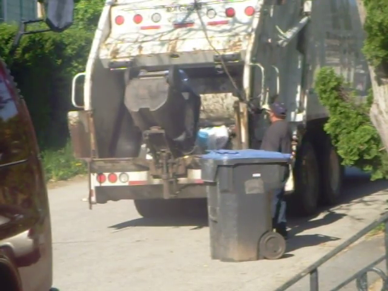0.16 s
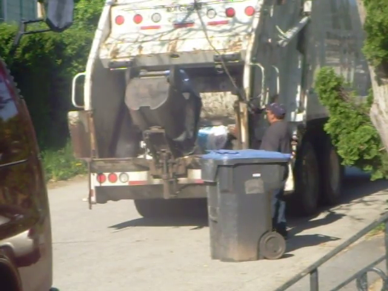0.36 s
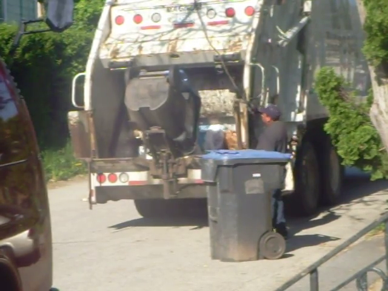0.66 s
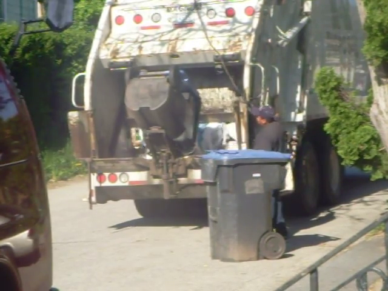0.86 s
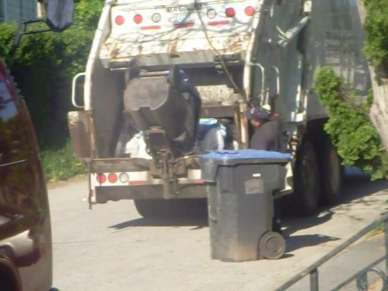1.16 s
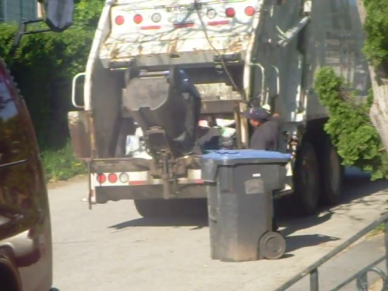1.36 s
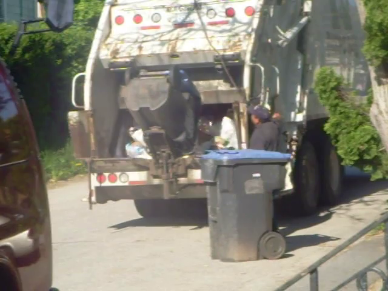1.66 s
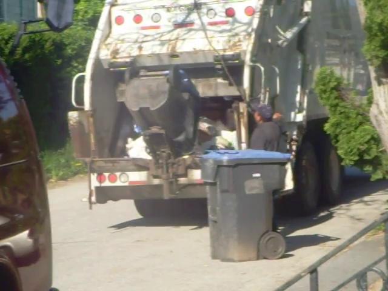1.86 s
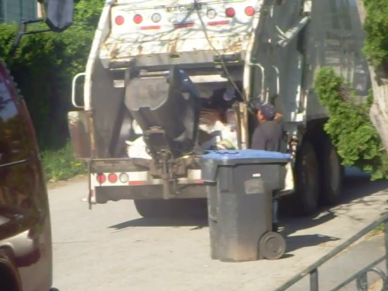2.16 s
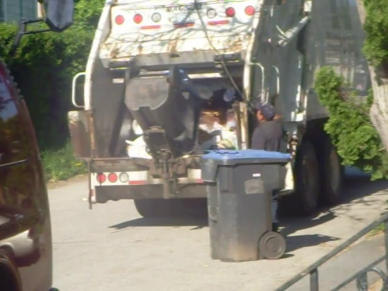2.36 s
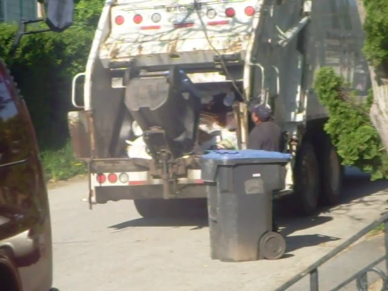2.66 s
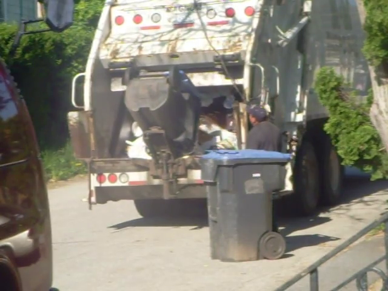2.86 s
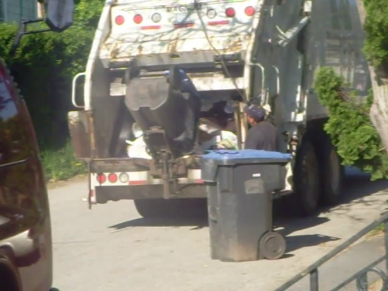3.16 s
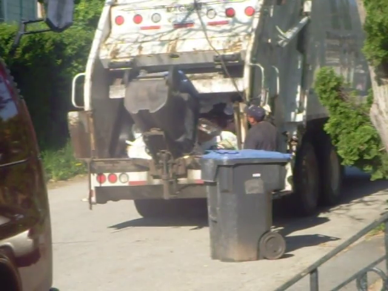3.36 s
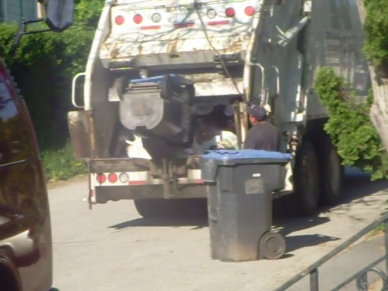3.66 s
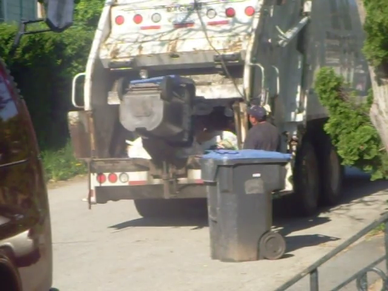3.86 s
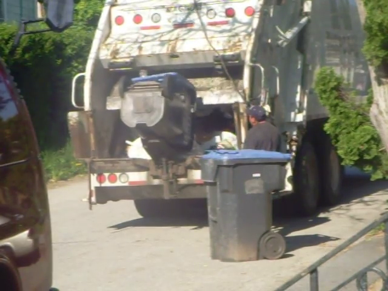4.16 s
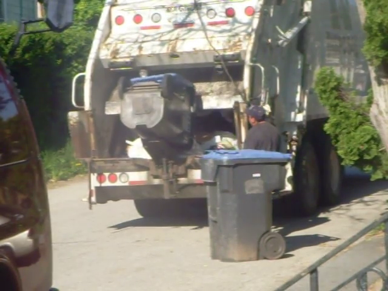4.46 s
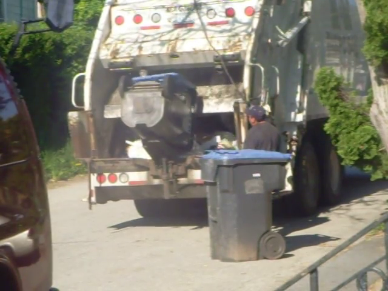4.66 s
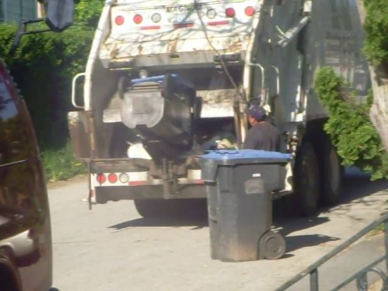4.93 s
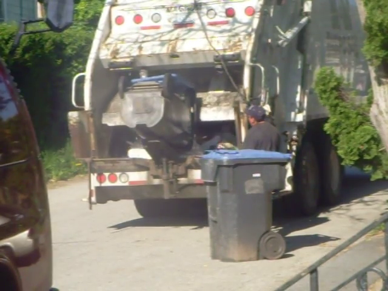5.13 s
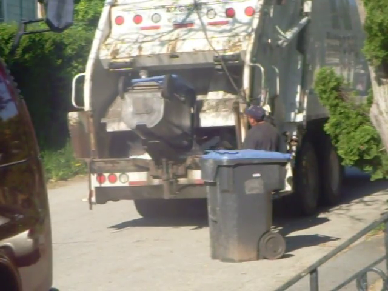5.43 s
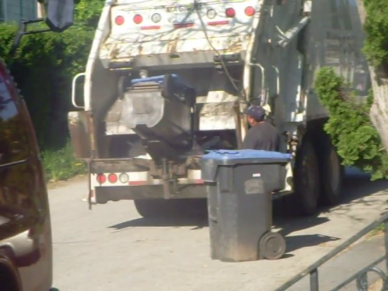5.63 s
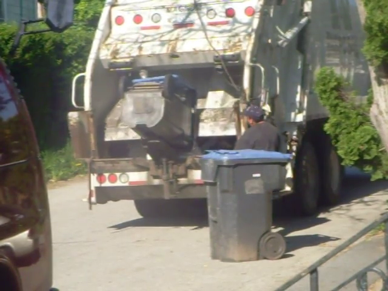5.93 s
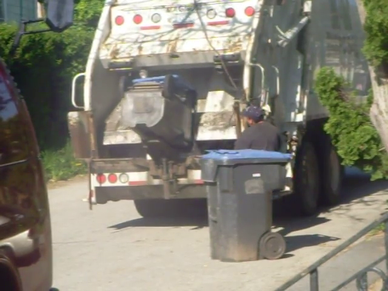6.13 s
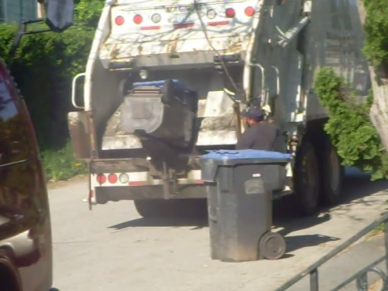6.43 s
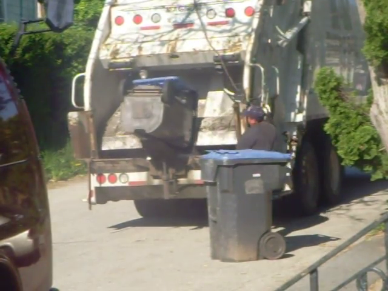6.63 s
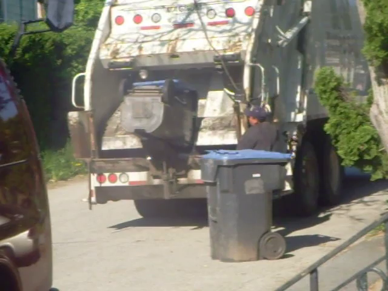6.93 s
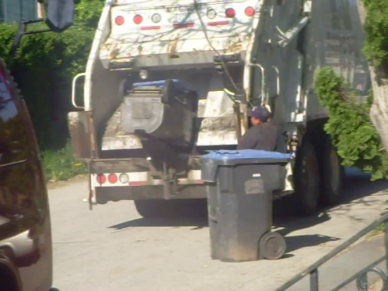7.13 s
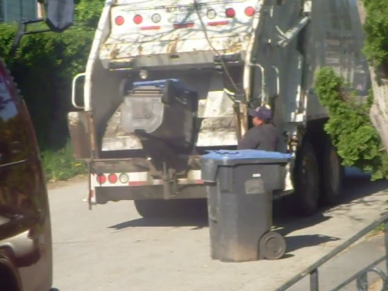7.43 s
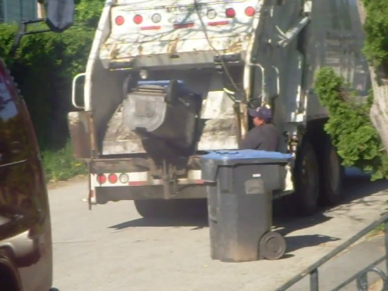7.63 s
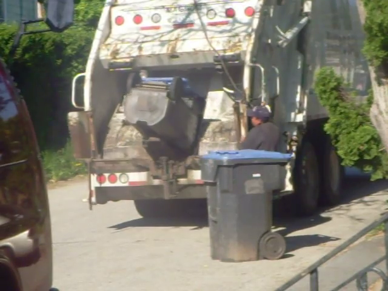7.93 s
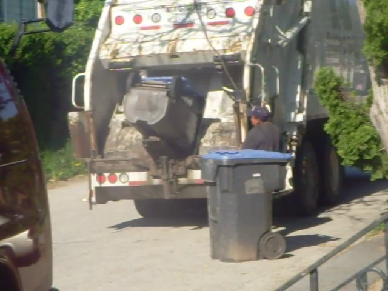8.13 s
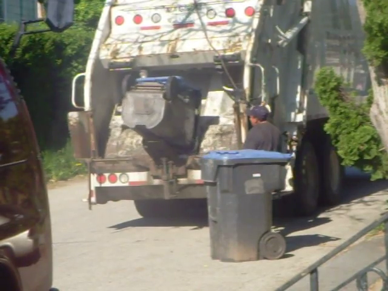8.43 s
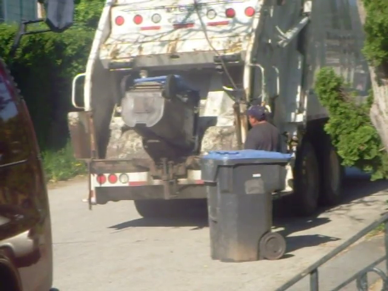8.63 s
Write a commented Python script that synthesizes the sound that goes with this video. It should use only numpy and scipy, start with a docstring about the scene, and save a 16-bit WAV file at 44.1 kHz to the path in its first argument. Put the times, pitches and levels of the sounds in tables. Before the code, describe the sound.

Trash clangs into a refuse truck as its engine roars and hydraulics whine, followed by a heavy slam and thuds.

```python
"""A diesel roar rises from idle as a refuse truck revs to drive its hydraulics; later it sags and recovers.
Exhaust hum, pump tone and gear whine are periodic sources locked to one shaft, so they glide together.
Rubbish strikes the steel hopper and excites its resonant modes; the packer blade slams, and the body
thuds and rumbles. Two faint squeaks sound near the start. A small microphone ducks and clips."""
import sys
import numpy as np
from scipy import signal
from scipy.io import wavfile
from scipy.ndimage import uniform_filter1d

SR = 44100
rng = np.random.default_rng(int(sys.argv[2]) if len(sys.argv) > 2 else 0)


def unload_wav(signal):
    """Save mono or channel-first audio to the path in sys.argv[1] as 16-bit WAV at rate SR, clipped to [-1, 1]."""
    wavfile.write(
        sys.argv[1],
        SR,
        np.round(np.clip(np.atleast_2d(signal).T, -1, 1) * 32767).astype(np.int16),
    )


N = 387624

# Modes of the steel hopper: pitch_hz, level_db, t60_s
HOPPER_MODES = [(201, 0.5, 0.18), (249, -4, 0.18), (327.4, 4, 0.14), (360, -2, 0.36), (403.5, -7, 0.71),
                (526, -7.5, 0.17), (597, -5.5, 0.47), (661.7, -1, 0.37), (794, -0.5, 0.15),
                (1014, 2.5, 0.24), (1035, 0.5, 0.11), (1255, -6.5, 0.33), (1486, -10.5, .12),
                (1800, -10, 0.11), (2096, 0.5, 0.3), (2180, -7, 0.48), (2314, -5.5, 0.37), (2395, 4, 0.071),
                (2570, -0.5, .1), (2668, -3, 0.21), (2700, -6, 0.083), (3430, -16, .12), (3730, -17.5, .1)]
# Thuds of the packer blade and cart: start_s, level_db, pitch_hz
BODY_THUDS = [(0.6, -15, 52), (2.403, -19, 78), (2.438, -1, 111), (2.477, 0.5, 56), (2.518, -6, 51.6),
              (2.659, -22, 57), (2.718, -8, 73), (3.287, -13, 64.8), (3.871, -14.5, 61), (6.347, -9, 74.6),
              (6.386, -11, 73), (6.461, -9.5, 78.1), (6.561, -12.5, 42), (6.677, -6, 80.5),
              (7.518, -8.5, 59), (7.552, -8, 70), (7.63, -12.5, 79.6), (7.7, -14.5, 75), (7.779, -12.5, 68)]


def gain_of(db):
    return 10 ** (np.asarray(db) / 20)


def unit_rms(x):
    return x / np.sqrt(np.mean(x ** 2) + 1e-20)


def curves(rows):
    """Linear interpolation of each column over the times in the first."""
    times_s, *columns = np.transpose(rows)
    return [np.interp(np.arange(N) / SR, times_s, column) for column in columns]


def add(mix, start_s, sound):
    part = mix[round(start_s * SR):][:len(sound)]
    part += sound[:len(part)]


def drift(per_s):
    """Random modulation: Gaussian values joined by straight lines."""
    count = int(N / SR * per_s) + 2
    return np.interp(np.arange(N) / SR * per_s, np.arange(count), rng.standard_normal(count))


def bursts(rows, rise_s, t60_s, hold_s=0):
    """Summed envelopes that rise to each (peak_s, level_db), hold, then decay exponentially."""
    t = np.arange(N) / SR
    return sum(np.clip((t - s) / rise_s + 1, 0, 1) * gain_of(db - 60 * np.maximum(t - s - hold_s, 0) / t60_s)
               for s, db in rows)


def swells(rows, edge_s=0.24):
    """Extra decibels that fade in and out within each span."""
    t = np.arange(N) / SR
    return sum(db * np.clip(np.minimum(t - start, end - t) / edge_s, 0, 1) for start, end, db in rows)


def noise(colour, patchy_db):
    """Spectral shaping: noise of rms 1 whose colour drifts in time-frequency patches."""
    frames, hz = N // 512 + 5, np.fft.rfftfreq(2048, 1 / SR)
    real, imag, patches = rng.standard_normal((frames, 1025, 3)).T
    patches = unit_rms(uniform_filter1d(uniform_filter1d(patches, size=16, axis=0), size=6, axis=1))
    colour_hz, colour_db = np.transpose(colour)
    db = np.interp(np.log(hz + 1), np.log(colour_hz + 1), colour_db, left=-90, right=-90)[:, None]
    spectra = (real + 1j * imag) * gain_of(db + patchy_db * patches)
    return unit_rms(signal.istft(spectra, nperseg=2048, noverlap=1536)[1][:N])


def tone(cycles, db, waver_db, waver_per_s):
    """A shaft-locked sine with random amplitude and phase modulation."""
    phase = 2 * np.pi * cycles + 0.13 * waver_db * drift(waver_per_s)
    return np.sqrt(2) * gain_of(db + waver_db * drift(waver_per_s)) * np.sin(phase)


def engine(teeth, firing_per_tooth=.2326):
    """Periodic combustion: firings make exhaust harmonics and modulate a broadband roar."""
    # Exhaust tones, dropping while the fuel is cut: time_s, firing_db, second_order_db
    exhaust = [(0, -41, -24), (.4, -29, -27), (.6, -19.5, -26.5), (.85, -27, -25), (1.2, -18, -26.5),
               (2.3, -18.5, -29.5), (2.8, -19, -25), (5.0, -18, -24), (6.0, -18.5, -25), (6.3, -19, -25.5),
               (6.7, -13.5, -26), (6.9, -33, -37.5), (7.4, -34.5, -35), (7.6, -26.5, -40), (8.0, -25, -25),
               (8.3, -21.5, -29.5), (8.79, -19, -30)]
    # Weak exhaust orders: firing_multiple, relative_db
    weak_orders = [(.5, -18.5), (1.5, -12.5), (3, -17.5), (4, -24.5)]
    # Diesel roar: time_s, level_db, extra_treble_db
    roar_levels = [(0, -26, -3), (.35, -26, -3.5), (.6, -16.5, -6.5), (.85, -19, 1.5), (1.4, -20, -0.5),
                   (1.6, -20.5, -1), (2.3, -22, 0.5), (2.62, -24.5, -6), (2.9, -21.5, 3.5), (3.3, -22, -3),
                   (3.7, -23.5, -0.5), (4.4, -21.5, 2), (5.1, -22, 3), (6.45, -22, 2.5), (6.76, -20, -3),
                   (7.2, -28, -1.5), (7.66, -23.5, -6.5), (8.0, -22, -3.5), (8.79, -23, -2)]
    # Its spectrum: frequency_hz, density_db
    roar_colour = [(88, -34.5), (150, -14), (185, -18), (240, -9), (300, -11), (360, -16), (500, -16.5),
                   (600, -15.5), (740, -20), (990, -19), (1350, -24), (2200, -19), (2650, -21.5),
                   (3050, -29.5), (3500, -27.5), (4700, -17.5)]
    firings = firing_per_tooth * teeth
    firing_db, second_db = curves(exhaust)
    hum = tone(firings, firing_db, 1, 14) + tone(2 * firings, second_db, 0.61, 12)
    hum += sum(tone(order * firings, firing_db + db, 1.6, 12) for order, db in weak_orders)
    roar_db, treble_db = curves(roar_levels)
    knock = 1 + 0.3 * np.exp(-(firings % 1) / 0.16) * (1 + .3 * (firings % 2 < 1))  # every other is harder
    roar = unit_rms(knock * gain_of(0.28 * drift(40)) * noise(roar_colour, 1.1))
    treble = signal.sosfiltfilt(signal.butter(2, 2700, "highpass", fs=SR, output="sos"), roar)
    roar += (gain_of(treble_db + 0.64 * drift(60)) - 1) * treble
    return hum + gain_of(roar_db) * roar


def rumble():
    """Structural vibration: the truck body rumbles faintly and shakes on after each thud."""
    # Spectrum of the body: frequency_hz, density_db
    colour = [(12, -11.5), (25, -7.5), (50, -3.5), (100, -6), (200, -19.5), (300, -20), (450, -24)]
    # The bass swells, then sinks while the fuel is cut: start_s, end_s, extra_db
    bass_swells = [(2.9, 4.4, 6), (6.8, 7.5, -8)]
    shaken = bursts([(s, db - 16.5) for s, db, _ in BODY_THUDS], rise_s=0.084, t60_s=1.1)
    background = gain_of(-33 + swells(bass_swells) + 3.2 * drift(3.1))
    return (background + shaken) * noise(colour, 0.98)


def street_gain(hz, floor_db=-22):
    """Interference: street echoes reinforce or cancel a tone according to its pitch."""
    # Points of cancellation: pitch_hz
    notches_hz = [140, 170, 198, 220, 249.5, 268, 277, 294.5, 312]
    humps = gain_of([-5, -0.5, -4, -0.5, -9, -8, -2, 0])  # between neighbouring notches
    place = np.interp(hz, notches_hz, np.arange(len(notches_hz)))
    hump = humps[np.minimum(place.astype(int), len(humps) - 1)]
    return gain_of(floor_db) + hump * np.sin(np.pi * (place % 1))


def pump(tooth_hz, teeth, governed_hz=301, mesh_per_tooth=3.687, whine_per_tooth=7.395):
    """Oil pressure ripple sounds harmonics of the tooth rate; meshing gears whine at fixed ratios to it."""
    # Pump tone at its source, rising with oil pressure: time_s, level_db
    source_levels = [(0, -28), (.3, -34), (.4, -22), (.9, -18), (1.12, -17.5), (1.65, -22.5), (1.8, -33),
                     (1.95, -23.5), (2.3, -21.5), (2.5, -32), (2.7, -20.5), (3.2, -23.5), (3.5, -31),
                     (3.9, -18.5), (4.35, -11), (5.2, -10), (5.55, -27), (5.95, -13), (6.35, -17),
                     (6.55, -17), (6.75, -10.5), (7.55, -10.5), (7.68, -16.5), (7.8, -12), (8.79, -12.5)]
    # Buzzes at steady speed: tooth_rate_multiple, level_db
    buzzes = [(5.28, -45), (6, -47), (8.14, -46), (11, -44), (12.09, -49)]
    # Harmonics 2 and 3, the loaded mesh and the whine stand out: start_s, end_s, extra_db
    second_swells = [(6.7, 7.5, 3.5), (7.75, 8.25, 4.5)]
    third_swells = [(6.9, 7.35, 13.5), (7.9, 9.0, 8)]
    mesh_swells = [(2.2, 3.9, 12.5), (5.0, 6.1, 8)]
    whine_swells = [(6.6, 7.2, 8.5), (7.1, 7.55, 5.5)]
    glide_hz_per_s = uniform_filter1d(np.gradient(tooth_hz) * SR, size=8000)
    sliding = np.minimum(abs(glide_hz_per_s) / 60, 1)
    rough_db = 2.6 * sliding  # sliding overtones beat against their own echoes
    speed_db = 12.5 * np.log2(tooth_hz / governed_hz)  # faster is louder
    ripple = street_gain(tooth_hz) * tone(teeth, curves(source_levels)[0], 0.74, 15)
    ripple += tone(2 * teeth, -35 + swells(second_swells) + speed_db, 3.5 + rough_db, 42)
    ripple += tone(3 * teeth, -44.5 + swells(third_swells) + speed_db, 1.5 + rough_db, 45)
    ripple += sum(tone(multiple * teeth, db - 25 * sliding, 1.7, 13) for multiple, db in buzzes)
    mesh = tone(mesh_per_tooth * teeth, -46 + swells(mesh_swells) + speed_db, 0.71 + rough_db, 22)
    whine = tone(whine_per_tooth * teeth, -36.5 + swells(whine_swells) + 1.6 * speed_db, .3, 9.9)
    chatter = .85 + .7 * drift(110)  # gear chatter broadens the spectral line
    return ripple + mesh + whine * chatter


def squeak(length_s, from_hz, to_hz, db):
    """A linear frequency sweep, heard as a short whistle."""
    hz = np.linspace(from_hz, to_hz, round(length_s * SR))
    return np.sqrt(2) * gain_of(db) * np.hanning(len(hz)) ** .5 * np.sin(2 * np.pi * np.cumsum(hz) / SR)


def hopper_ring(force, weights):
    """Modal response: the force is convolved with weighted, damped sines of random phase."""
    t, phases = np.arange(12000) / SR, rng.random(len(HOPPER_MODES))
    modes = sum(weight * gain_of(db - 60 * t / t60) * np.sin(2 * np.pi * (hz * t + phase))
                for weight, phase, (hz, db, t60) in zip(weights, phases, HOPPER_MODES))
    return signal.oaconvolve(force, modes * np.minimum(t / 0.0012, 1))


def blow(peak_db, high_hz, low_hz, low_db, ring_share, rise_s=.003, t60_s=.21):
    """Impact excitation: modes near the struck spot's two pitches ring most, over a broad crunch."""
    t, mode_hz = np.arange(14000) / SR, np.transpose(HOPPER_MODES)[0]
    burst = rng.standard_normal(len(t)) * gain_of(-60 * t / t60_s) * np.minimum(t / rise_s, 1)
    near = lambda hz: 0.46 + np.exp(-(np.log(mode_hz / hz) / 0.079) ** 2)
    weights = np.where(mode_hz > 1400, near(high_hz), gain_of(low_db) * near(low_hz))
    bounces = burst * gain_of(-30 * t / t60_s)
    force = signal.unit_impulse(len(t)) + 0.82 * bounces / np.linalg.norm(bounces)
    ring = hopper_ring(force, weights)[:len(t)] * gain_of(-20 * t / t60_s)
    bright = signal.lfilter(*signal.butter(1, [0.79 * high_hz, 1.13 * high_hz], "bandpass", fs=SR), burst)
    dull = signal.lfilter(*signal.butter(1, [160, 1300], "bandpass", fs=SR), burst)
    crunch = bright + 0.58 * gain_of(low_db) * dull
    sound = ring_share * unit_rms(ring) + (1 - ring_share) * unit_rms(crunch)
    return gain_of(peak_db) * sound / abs(sound).max()


def tumble(ticks_per_s=300):
    """Shot noise: small pieces of rubbish tick at random on the steel and excite its upper modes."""
    # Slides of rubbish: peak_s, level_db
    spills = [(.488, -22), (.972, -16), (1.2, -13.5), (1.362, -9.5), (1.5, -18.5), (1.68, -18), (3.28, -21)]
    hiss = rng.standard_normal(N)
    sizes = gain_of(6.2 * np.minimum(rng.exponential(1, N), 4))
    ticks = hiss * (0.47 + sizes * (rng.random(N) < ticks_per_s / SR))
    ring = hopper_ring(ticks, np.transpose(HOPPER_MODES)[0] > 500)[:N]
    direct = signal.lfilter(*signal.butter(1, [500, 3500], "bandpass", fs=SR), ticks)
    return bursts(spills, rise_s=0.011, t60_s=0.56) * unit_rms(.5 * unit_rms(ring) + unit_rms(direct))


def thud(db, hz, t60_s=0.14):
    """Damped vibration of the truck body: a low mode and a faster-dying panel overtone."""
    t = np.arange(20000) / SR
    panel = 0.23 * gain_of(-30 * t / t60_s) * np.sin(2 * np.pi * 2.9 * hz * t)
    envelope = gain_of(db - 60 * t / t60_s) * np.minimum(t / 0.0032, 1)
    return envelope * (np.sin(2 * np.pi * hz * t) + panel)


def blade_slam(start_s=2.34, level_db=-9, rise_s=0.073):
    """A broadband transient: the packer blade slams with a dense crunch."""
    # Spectrum of the crunch: frequency_hz, density_db
    colour = [(90, -18), (220, -8), (600, -11), (1300, -21), (2200, -15), (3100, -24), (4700, -22.5)]
    return bursts([(start_s + rise_s, level_db)], rise_s, t60_s=0.47, hold_s=0.051) * noise(colour, 3)


def scene(empty_until_s=.55):
    """Superposition of the shaft-driven machinery and each blow, thud and squeak."""
    # Shaft speed (rev up, governed run, sag under load, recovery): time_s, tooth_rate_hz
    shaft = [(0, 153), (.25, 158), (.35, 175), (.45, 208), (.55, 233), (.75, 265), (1.0, 297),
             (1.12, 301.7), (2.4, 301.3), (2.6, 300.3), (6.5, 300.4), (6.6, 293), (6.72, 306), (7.1, 261.5),
             (7.6, 204), (7.7, 209.5), (7.95, 270), (8.015, 295), (8.07, 302), (8.79, 302)]
    # Blows on the hopper: start_s, peak_db, high_ring_hz, low_ring_hz, low_part_db
    blows = [(0.15, -17.5, 2980, 806, -0.5), (0.412, -3, 1890, 670, 0), (0.44, -7, 2100, 665, 14),
             (0.461, -8.5, 2600, 670, 8), (0.481, 2, 2065, 670, -2), (0.604, -9.5, 1860, 567, 10),
             (0.652, -6.5, 1710, 1010, 12), (0.679, -11, 2260, 350, 0), (0.777, -16.5, 2270, 514, 1),
             (0.81, -8.5, 2430, 355, 4), (0.855, -5.5, 2530, 647, 4), (0.964, -5, 2170, 766, 1),
             (1.079, -15.5, 2090, 328, -1), (1.192, 4, 2550, 340, 0), (1.25, -7, 2000, 338, 11),
             (1.319, -13, 1990, 326, 1), (1.354, 4, 2120, 990, -10.5), (1.419, -3.5, 2230, 970, -1),
             (1.444, -5.5, 2460, 624, -18), (1.526, -1, 2530, 317, -15.5), (1.671, -4.5, 2130, 330, 3),
             (1.709, -7.5, 2230, 319, 17), (2.36, -10, 2200, 400, 3), (2.385, -7, 1900, 718, 1),
             (2.4, -3.5, 2230, 660, 4), (2.424, -4, 2060, 630, 2), (2.444, -0.5, 2230, 670, -4),
             (3.27, -13.5, 1900, 640, 1), (6.466, -11, 2330, 329, -1.5), (6.555, -4.5, 3500, 660, -0.5),
             (6.534, -4.5, 2250, 320, 1.5), (6.575, -5, 2190, 760, 4), (6.609, -5, 1990, 326, 13),
             (6.65, -15, 2100, 600, 3), (7.503, -12.5, 1960, 385, -2.5), (7.56, -17, 2500, 384, 3)]
    # Faint, distant squeaks: start_s, length_s, from_hz, to_hz, level_db
    squeaks = [(.09, 0.06, 3950, 3850, -43), (.155, 0.061, 2900, 2800, -36)]
    tooth_hz = curves(shaft)[0]
    teeth = np.cumsum(tooth_hz) / SR  # pump phase in cycles
    mix = engine(teeth) + rumble() + pump(tooth_hz, teeth) + tumble() + blade_slam()
    for start_s, *row in blows:
        ring_share = .75 if start_s < empty_until_s else .55  # the empty hopper rings clearer
        add(mix, start_s, blow(*row, ring_share))
    for table, source in (BODY_THUDS, thud), (squeaks, squeak):
        for start_s, *row in table:
            add(mix, start_s, source(*row))
    return mix[None]


def record(dry, mic_hz=4050, stop_hz=4680, threshold_db=-13, recovery_db_per_s=9.6, ceiling=.715):
    """Preamplifier saturation, a narrow microphone band, gain control after bangs, then hard clipping."""
    rounded = .98 * np.tanh(dry / .98)
    band = signal.sosfilt(signal.butter(8, mic_hz, fs=SR, output="sos"), rounded)
    band = signal.sosfilt(signal.cheby2(12, 60, stop_hz, fs=SR, output="sos"), band)
    power_db = 10 * np.log10(abs(uniform_filter1d(band[0] ** 2, size=2000)) + 1e-12)
    recovery_db = np.arange(N) * recovery_db_per_s / SR
    held_db = np.maximum.accumulate(power_db + recovery_db) - recovery_db  # peak detector
    over_db = np.maximum(held_db - threshold_db, 0)
    duck_db = 0.43 * signal.lfilter([.0004], [1, -.9996], over_db)  # lags behind the bang
    clipped = np.clip(band / gain_of(duck_db), -ceiling, ceiling) - .0028  # slight DC offset
    lowpass = signal.firwin(511, 15800, window=("kaiser", 9), fs=SR)
    return signal.oaconvolve(clipped, lowpass[None], "same")


dry = scene()
out = record(dry)
unload_wav(out)
```